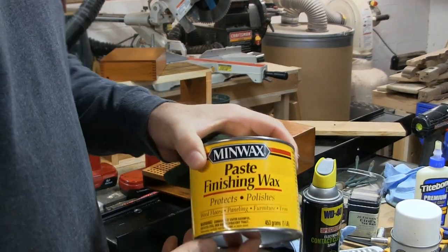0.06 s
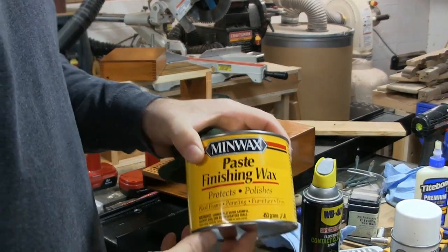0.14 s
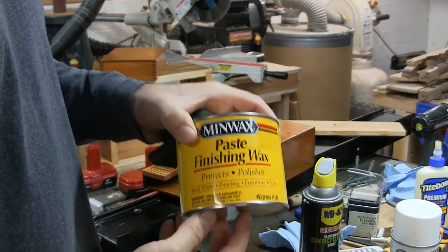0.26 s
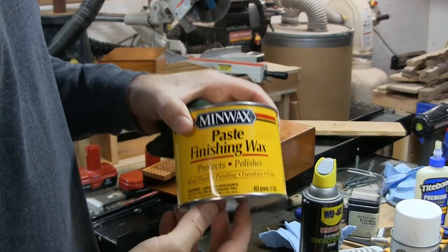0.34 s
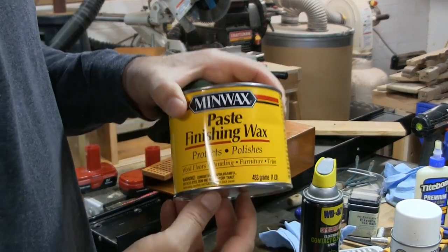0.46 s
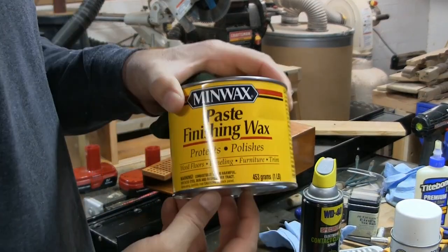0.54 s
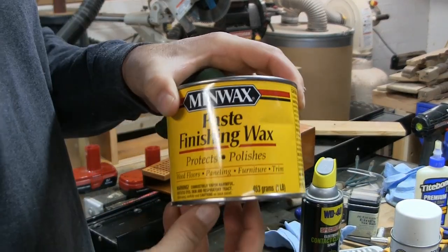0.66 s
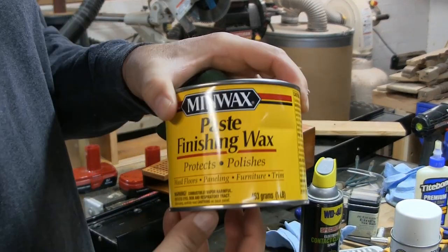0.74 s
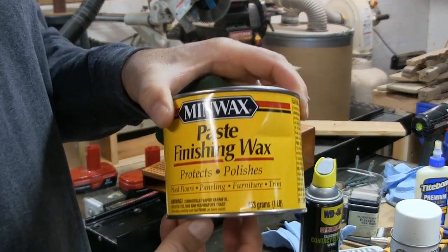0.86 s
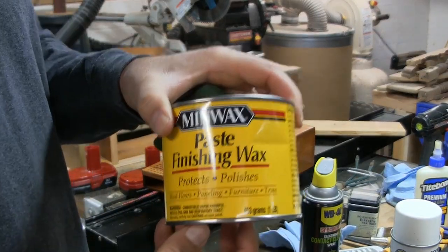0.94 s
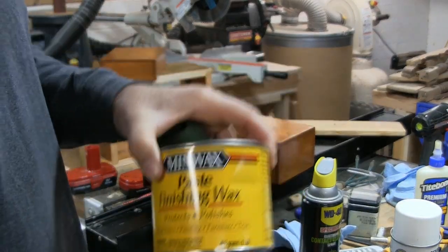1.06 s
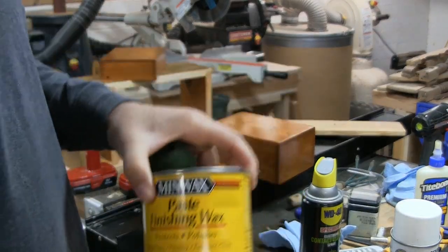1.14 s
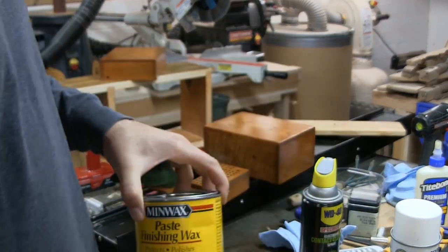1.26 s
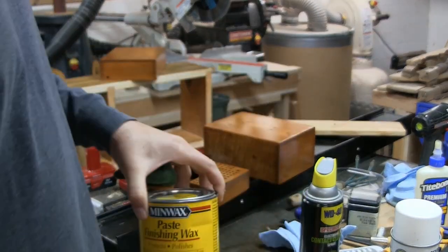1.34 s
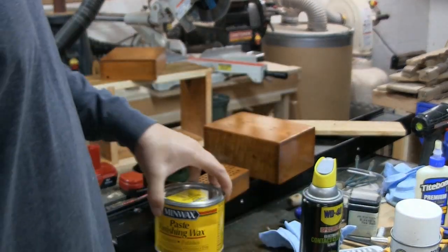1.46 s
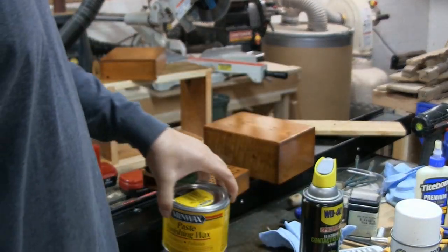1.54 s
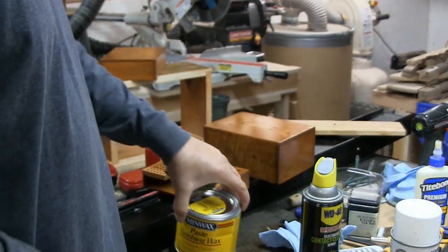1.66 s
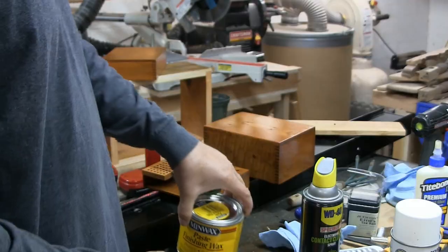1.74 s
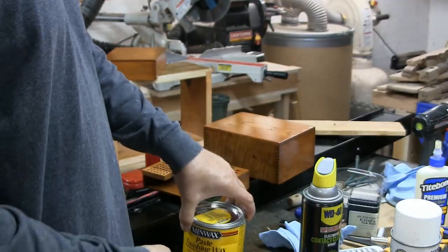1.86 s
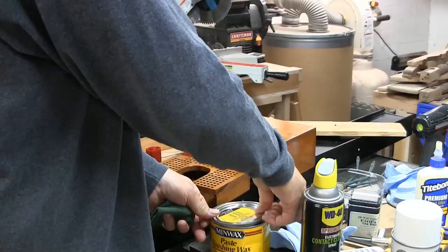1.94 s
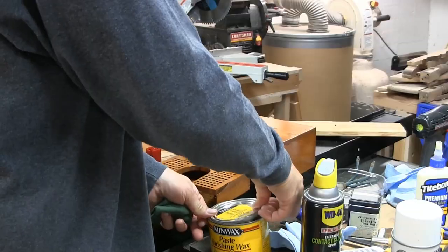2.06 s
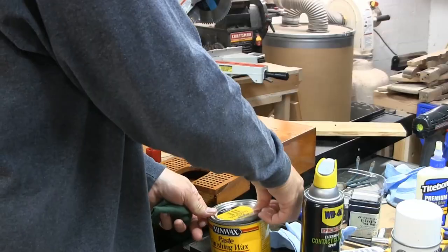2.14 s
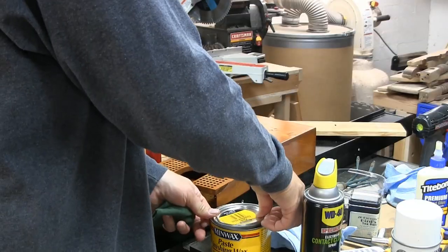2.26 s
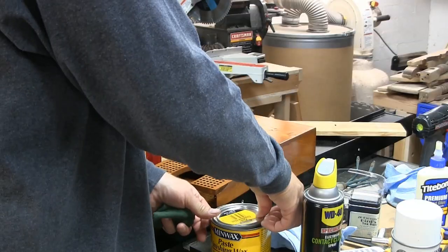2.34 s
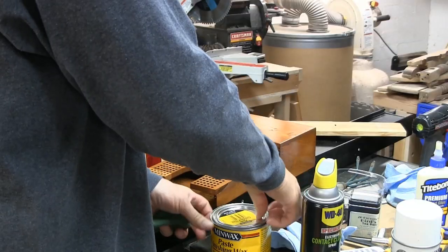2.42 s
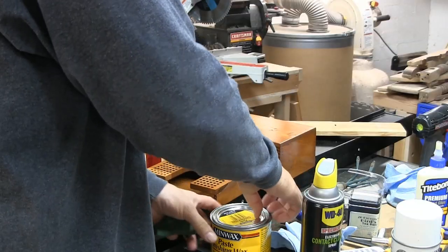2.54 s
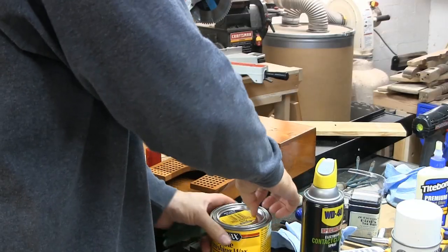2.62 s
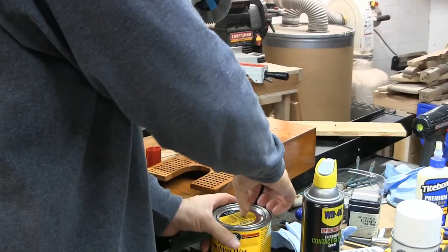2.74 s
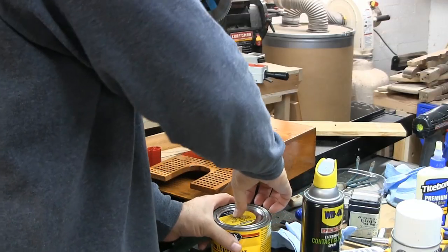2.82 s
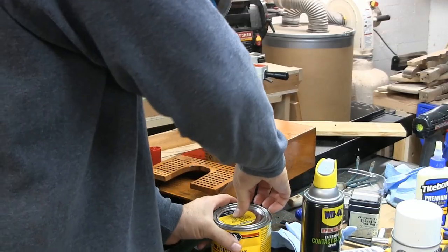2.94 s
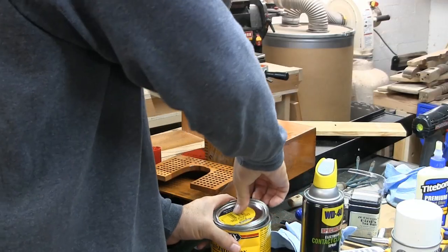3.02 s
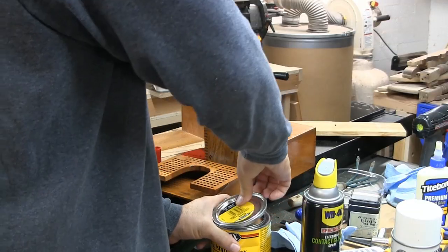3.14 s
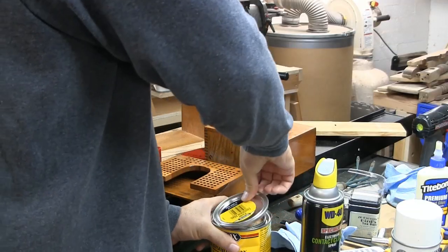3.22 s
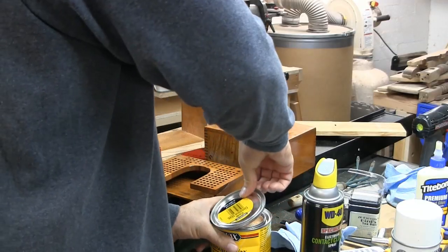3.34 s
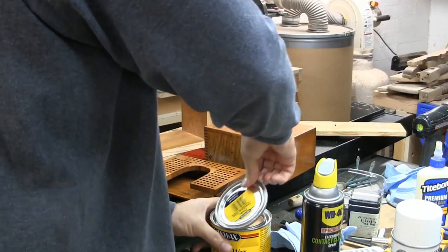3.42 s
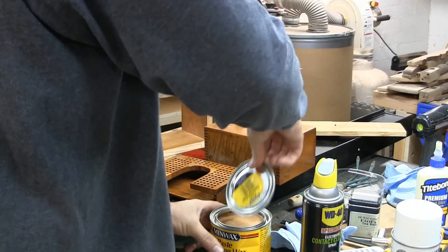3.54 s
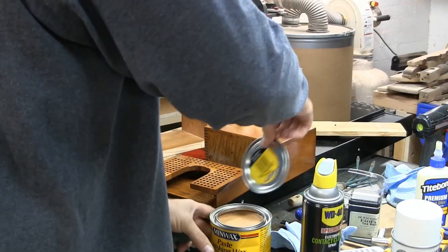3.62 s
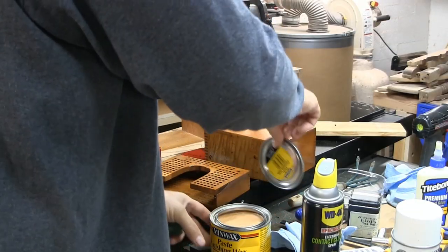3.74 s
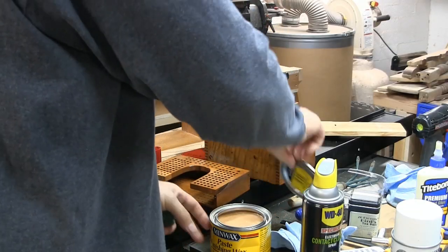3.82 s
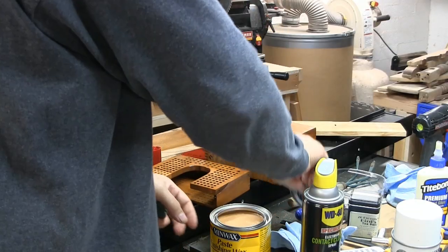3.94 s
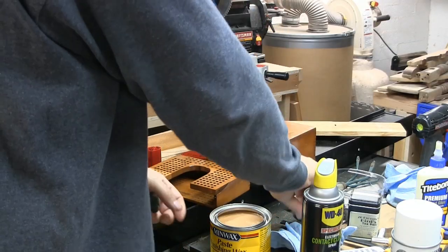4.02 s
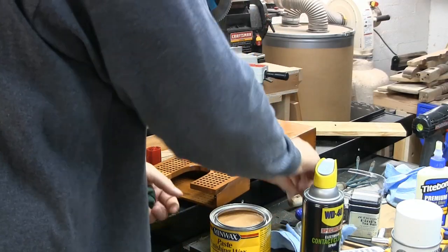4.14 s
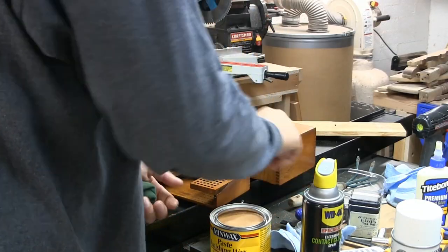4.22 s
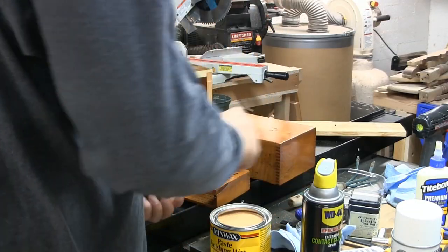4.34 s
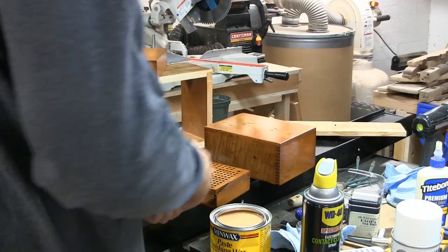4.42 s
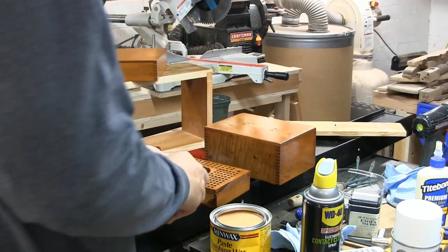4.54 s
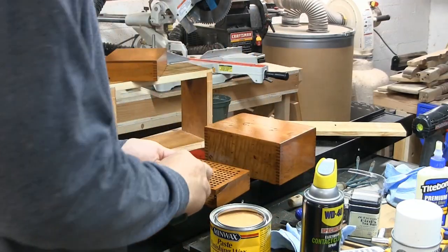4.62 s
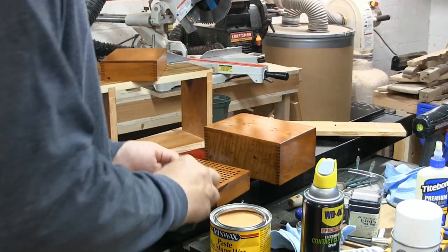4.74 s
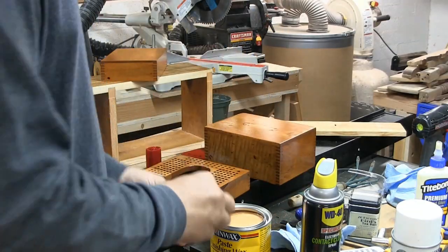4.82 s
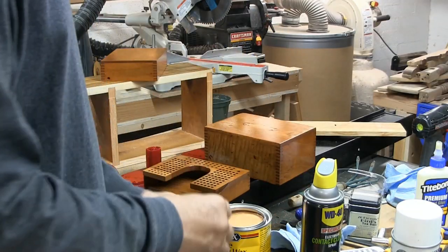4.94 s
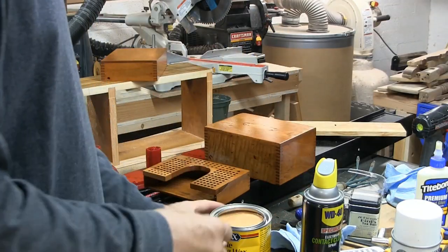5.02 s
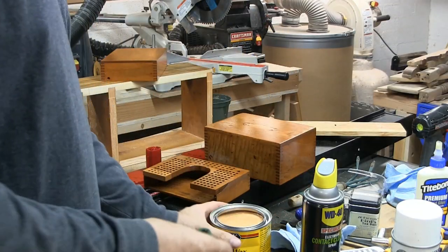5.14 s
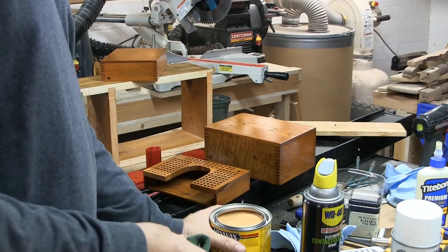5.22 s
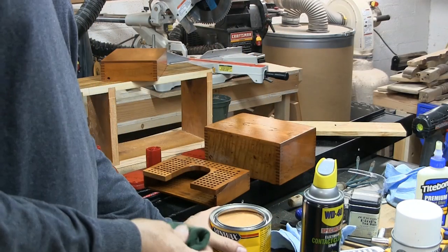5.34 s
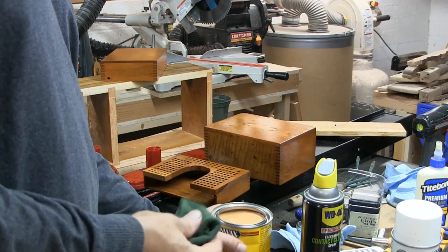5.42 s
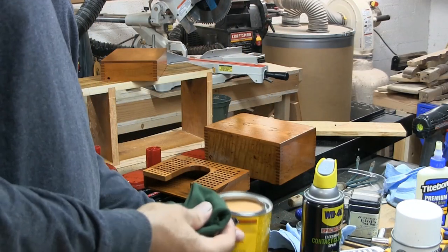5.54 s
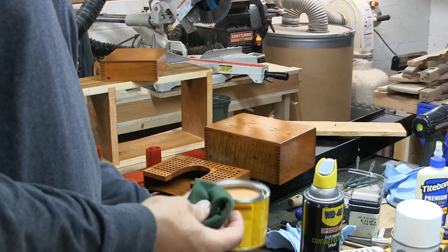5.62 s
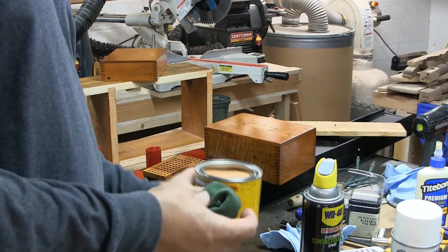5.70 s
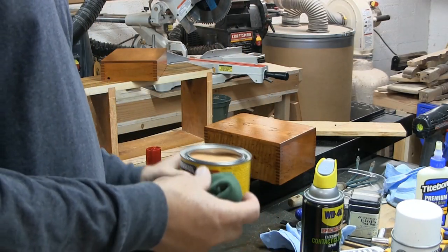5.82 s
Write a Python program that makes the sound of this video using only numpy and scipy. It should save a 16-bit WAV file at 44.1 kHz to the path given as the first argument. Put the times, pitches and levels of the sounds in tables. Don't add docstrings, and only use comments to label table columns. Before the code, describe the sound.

Low tin knocks, two sharp cracks as a steel lid is pried off, and a bright short clatter, with quiet motor hum behind.

```python
import sys
import numpy as np
from scipy import signal
from scipy.fft import rfft, irfft, next_fast_len
from scipy.io import wavfile
from scipy.ndimage import map_coordinates

SR = 44100
rng = np.random.default_rng(int(sys.argv[2]) if len(sys.argv) > 2 else 0)


def gain_from_db(level_db):
    decades = np.asarray(level_db, float) / 20
    return 10 ** decades


def dump(signal):
    limited = np.clip(np.atleast_2d(signal).T, -1, 1)
    pcm = np.round(limited * 32767).astype(np.int16)
    wavfile.write(sys.argv[1], SR, pcm)


N = 258646

# start in seconds, peak in dB, brightness in dB per octave, crack in dB.
LID_BOUNCES = [(4.0492, 2, -1.5, -4), (4.0526, -6, 4, -5.5), (4.057, -6, -4, -5), (4.066, -11.5, -1, -0.5),
               (4.072, -12, -6, -6), (4.085, -9.5, -5, -2.5), (4.125, -7.5, 0.5, 0), (4.1295, -11, 3, -3.5),
               (4.136, 2, 1, -11.5), (4.145, -5, 0, -10), (4.156, -17.5, -2, -10), (4.2121, -12.5, 10, -15),
               (4.2141, -3, -1, -3), (4.2256, -8.5, -1, -12.5), (4.237, -18, -3, -11),
               (4.246, -10.5, 1, -11.5)]
# frequency in Hz, level in dB, decay time t60 in seconds.
FULL_TIN_MODES = [(141.45, -18.5, 0.62), (249, -15.5, 0.72), (309.5, -9, 0.147), (374.4, -4, 0.149),
                  (543.4, 0, 0.1126), (659, -9.5, 0.106), (826, 7, 0.0544), (1004, -39, 0.29),
                  (1184, -33, 0.13), (1297, -17.5, 0.12), (1270, -36, 0.089), (1622, -5, 0.05),
                  (1923, -19, 0.115), (1977, -8.5, 0.049), (2300, -13, 0.0486), (2685, -20.5, 0.055),
                  (3027, -15.5, 0.052)]
FREE_LID_MODES = [(251, -20, 0.12), (655, -21, 0.12), (1295, -15, 0.1), (1585, -8, 0.22), (1995, -14, 0.06),
                  (2254, -12, 0.1), (2615, -22, 0.1), (2897, -16, 0.1), (3270, -12, 0.13),
                  (3455, -13, 0.15), (3789, -17, 0.15), (4074, -7, 0.12), (4121, -15, 0.12),
                  (4184, -8, 0.125), (4966, -11, 0.12), (5095, -5, 0.15), (5351, -24, 0.15),
                  (5592, -6, 0.24), (6257, -9, 0.13), (6477, -17, 0.15), (6900, -1, 0.085), (7027, 1, 0.09),
                  (7493, -20, 0.15), (7713, -12, 0.17), (8160, -16, 0.15), (8500, -15, 0.14),
                  (9046, -13, 0.12), (9869, -14, 0.085), (10919, -22, 0.12), (11591, -28, 0.11)]
# frequency in Hz, level in dB per Hz.
POP_COLOUR = [(59, -60), (100, -53.5), (634, -14.5), (3320, -6.5), (3700, -5.5), (4020, -29), (5420, -3),
              (7140, -22), (9500, -24), (11000, -32.5), (16000, -47.5)]
CLANK_COLOUR = [(59, -51.5), (100, -30.5), (634, -14), (818, -19.5), (1580, -2), (1760, -28.5), (2220, -11),
                (3620, -3.5), (4110, 1.5), (4470, -13), (5900, -8), (6990, -5), (10500, -14),
                (16000, -31.5)]
GRIP_DB_PER_S, LET_GO_DB_PER_S = 4000.5, 900


def unit(x):
    return x / np.sqrt(np.mean(x ** 2) + 1e-20)


def along(points, hz):
    f, v = np.transpose(points)
    return np.interp(np.log(hz + 1), np.log(f + 1), v)


def wobble(rate):
    knots = rng.standard_normal(int(N * rate / SR) + 4)
    return map_coordinates(knots, [np.arange(N) * rate / SR])


def filtered(x, response):
    m = next_fast_len(len(x))
    spectrum = rfft(x, m) * response(np.fft.rfftfreq(m, 1 / SR))
    return unit(irfft(spectrum, m)[:len(x)])


def coloured(x, spectrum):
    return filtered(x, lambda hz: gain_from_db(along(spectrum, hz)))


def resonant(x, peaks):
    def response(f):
        total = 0
        for k, (centre, width, db) in enumerate(peaks):
            width = max(width, 0.028 * centre)
            mode = 1j * f * width / (centre * centre - f * f + 1j * f * width)
            total = total + (-1) ** k * gain_from_db(db) * mode
        return total
    return filtered(x, response)


def slips(rate, clump_db):
    hits = rng.random(N) < rate / SR
    return hits * rng.standard_normal(N) * gain_from_db(clump_db * wobble(80))


def stroke(start, end, start_db, end_db, swell, fade):
    t = np.arange(N) / SR
    held_db = np.interp(t, [start, max(end, start + 1 / SR)], [start_db, end_db])
    return gain_from_db(held_db - swell * np.clip(start - t, 0, None) - fade * np.clip(t - end, 0, None))


def ring(modes, t, scatter_db, tilt_db=0, length=1, waver_db=0):
    hz, db, t60 = np.transpose(modes)[:, :, None]
    db = db + tilt_db * np.log2(hz / 1000) + scatter_db * rng.standard_normal(hz.shape)
    knots = rng.standard_normal((2, len(hz), 64))
    swing, slip = np.array([[np.interp(t, np.arange(64) / 120, k) for k in part] for part in knots])
    hz = hz * (1 + 0.0018 * knots[1, :, -1:])
    cycles = (hz * t).astype(np.float32)
    phase = np.float32(2 * np.pi) * cycles + (0.21 * waver_db * slip).astype(np.float32)
    tones = np.sin(phase) * (1 - np.exp(-cycles / np.float32(1.8)))
    level_db = db + waver_db * swing - 60 * t / (np.clip(t60, 0.01, 0.6) * length)
    tones *= np.exp((level_db * np.log(10) / 20).astype(np.float32))
    return tones.sum(0) / np.sqrt(np.sum(gain_from_db(db) ** 2) / 2)


def blows(events, modes, colour, ring_db, crack_s, rattle_db, rattle_s, rise_s, waver_db, length):
    # start in seconds, loss in dB.
    damped = [(1.87, 0.5), (1.888, -3), (2.351, 0), (3.2857, -1), (3.2939, -4.5), (3.5243, -4), (4.061, -6),
              (4.091, -2.5), (4.142, -6), (4.153, 0.5), (4.222, -4.5), (4.26, -4.5)]
    damp_s = 0.002
    out, t = np.zeros(N + SR), np.arange(SR * 3 // 10) / SR
    for s, db, tilt_db, crack_db in events:
        tilted = [(hz, g + tilt_db * np.log2(hz / 1000)) for hz, g in colour]
        noise = coloured(rng.standard_normal(len(t)), tilted)
        rise = 1 - np.exp(-(t / rise_s) ** 2)
        crack = noise * rise * gain_from_db(-60 * t / crack_s)
        crack = gain_from_db(crack_db - 8) * crack / np.abs(crack).max()
        rattle = noise * rise * gain_from_db(rattle_db - 60 * t / rattle_s)
        body = gain_from_db(ring_db) * rise * ring(modes, t, 0.965, tilt_db, length, waver_db)
        touches = [(at, loss) for at, loss in damped if s < at < s + t[-1]]
        loss_db = sum(loss * np.clip((s + t - at) / damp_s, 0, 1) for at, loss in touches)
        out[round(s * SR):][:len(t)] += gain_from_db(db + loss_db) * (crack + body + rattle)
    return out[:N]


def tin():
    # start in seconds, peak in dB, brightness in dB per octave, crack in dB.
    set_down = [
        (1.8567, -2.5, -1, -1),
        (1.878, -13, -1, 0.5),
        (1.884, -26, -4, -5),
    ]
    shift = [
        (1.9602, -7, 0.5, -2),
        (2.3204, -8, 0.5, -6),
        (2.3232, -18, 4.5, 0),
        (2.342, -14.5, -4, -12.5),
    ]
    settle = [(1.985, -28, -8.5, -10), (2.02, -27.5, 2, -10.5), (2.045, -30.5, 3, -9.5)]
    bench_knocks = [(2.4475, -24, -6, -20.5), (3.521, -33, -4, -14), (4.051, -29.5, -6, -19),
                    (3.124, -31, 6.5, -10), (3.131, -30, 3, -11.5), (3.2905, -30.5, 4.5, -19.5),
                    (4.137, -34.5, -5, -20), (4.2143, -36, -9.5, -20.5)]
    # frequency in Hz, level in dB, decay time t60 in seconds.
    landing_modes = [(100.7, -17, 0.26), (173.5, -20.5, 0.286), (268.3, -18.5, 0.53), (377, 0.5, 0.108),
                     (460.2, -4, 0.132), (510, -12, 0.06), (550.6, 0, 0.138), (633.7, -4.5, 0.107),
                     (828.4, 0, 0.116), (981, -16, 0.12), (1130, -28, 0.14), (1329, 6.5, 0.039),
                     (1386, -9.5, 0.067), (1507.6, 7.5, 0.0478), (1786, -14, 0.107), (2130, -16.5, 0.117),
                     (2580, -27.5, 0.027), (3043, -23, 0.037)]
    turned_modes = [(153.96, -17, 0.65), (262.5, -22, 0.44), (301.5, -11, 0.14), (368.7, -9, 0.161),
                    (548.8, 2, 0.1104), (654.4, -3.5, 0.108), (820, 0, 0.121), (956.6, -5, 0.164),
                    (1048, 3, 0.057), (1201, -4, 0.069), (1243, -10, 0.12), (1606, -5.5, 0.073),
                    (1848, 0, 0.0343), (2222, -9, 0.045), (2390, -16, 0.058), (2567, -17, 0.063),
                    (3100, -16, 0.06)]
    bench_modes = [(215.3, 0, 0.065), (385, 5, 0.05551), (523.9, -4.5, 0.053), (650.7, -12.5, 0.0705),
                   (1092, -17, 0.045)]
    # frequency in Hz, level in dB per Hz.
    slam_colour = [(47, -60), (80, -42.5), (212, -10.5), (346, -8), (1070, -1.5), (1600, -3), (2000, -14),
                   (3320, -17.5), (5000, -25), (9000, -44.5), (16000, -50.5)]
    thud_colour = [(47, -59), (80, -35), (212, -19), (346, -5), (1070, -4.5), (1530, -6), (2380, -11),
                   (3320, -22.5), (16000, -61.5)]
    soft = dict(crack_s=0.00746, rattle_db=-19.5, rattle_s=0.1595, waver_db=3.5, rise_s=0.0013)
    landing = blows(set_down, landing_modes, slam_colour, ring_db=-3, length=0.767, **soft)
    rebound = blows(shift[:1] + settle, FULL_TIN_MODES, thud_colour, ring_db=-7, length=1, **soft)
    turn = blows(shift[1:], turned_modes, thud_colour, ring_db=-9, length=0.822, **soft)
    bench = blows(bench_knocks, bench_modes, thud_colour, ring_db=4.5, length=0.65, **soft)
    return landing + rebound + turn + bench


def prised_lid():
    # start in seconds, peak in dB, brightness in dB per octave, crack in dB.
    prise = [
        (3.1012, -21, -1, -6),
        (3.2835, -6, 2, 2),
        (3.2908, -0.5, -1, 0),
    ]
    creaks = [(3.2183, -36.5, 5, -5), (3.2432, -34.5, 5.5, -2.5), (3.259, -27, -6.5, -8),
              (3.268, -22.5, -11.5, -15.5), (3.309, -28.5, 0.5, -11.5), (3.324, -26.5, -2, -9),
              (3.336, -25, 0.5, -16), (3.347, -30.5, 1, -12), (3.365, -26, 2, -17),
              (3.4383, -36.5, -2, -20)]
    # frequency in Hz, level in dB, decay time t60 in seconds.
    levered_modes = [(827, -7, 0.089), (1060, 1.5, 0.0304), (1231, -7, 0.068), (1713, -12, .04),
                     (2748, 0.5, 0.0322), (3560, -5.5, 0.035), (4006, -6.5, 0.0297), (4956, -4, 0.028),
                     (5820, -7.5, 0.0283), (7050, -11, .028), (8700, -13, 0.026)]
    tight_modes = [(940, -10.5, 0.042), (1273, 2.5, 0.0454), (1448, -2.5, 0.042), (2464, -6, 0.078),
                   (3336, -6, 0.068), (3960, -11, 0.042)]
    strained_modes = [(645, -19.5, 0.044), (980, -19, 0.046), (1314, -9.5, 0.064), (1542, 3, 0.057),
                      (2463, -9, 0.054), (2783, -0.5, 0.065), (3483, -11, 0.053), (3600, -6.5, 0.062),
                      (5000, -14.5, .04)]
    seated_modes = [(652, -1.5, 0.1225), (1010, -39, 0.11), (1275, -1, 0.079), (1399, 11.5, 0.0148),
                    (1522, -6, 0.084), (1580, -27, 0.091), (2430, -4.5, 0.073), (2810, -11.5, 0.146),
                    (3546, 2.5, 0.0337), (4030, -3.5, 0.07), (5060, -32, 0.036), (6175, -20, 0.073),
                    (7160, -17, 0.167), (8600, -22, 0.069), (9820, -19, 0.085)]
    # frequency in Hz, level in dB per Hz.
    snap_colour = [(59, -60), (100, -43), (1360, 7), (1870, -20), (3050, -10.5), (3470, -6.5), (4470, -15),
                   (7140, -11), (16000, -39.5)]
    lever = blows(prise[:1], levered_modes, snap_colour, ring_db=-3.5, crack_s=0.014, rattle_db=-17,
                  rattle_s=0.102, rise_s=0.00103, waver_db=1.5, length=0.813)
    creak = dict(ring_db=-1, crack_s=0.0103, rattle_db=-27.5, rattle_s=0.05, rise_s=0.00157,
                 waver_db=-0.5, length=0.764)
    tight = blows(creaks[:4], tight_modes, snap_colour, **creak)
    strained = blows(creaks[4:], strained_modes, snap_colour, **creak)
    seated = blows(prise[1:], seated_modes, snap_colour, ring_db=-8, crack_s=0.0167, rattle_db=-29,
                   rattle_s=0.11, rise_s=0.00062, waver_db=2.5, length=0.9)
    return lever + tight + strained + seated


def released_lid():
    # start in seconds, peak in dB, brightness in dB per octave, crack in dB.
    release = [
        (3.482, -23.5, 0.052, -3.5),
        (3.503, -20.5, -0.039, 2),
        (3.5203, -1, -0.83, 5),
        (3.5228, -3.5, -0.58, -3.5),
    ]
    rim_brushes = [(3.5395, -19.5, 10.5, 1), (3.553, -19, 7.5, -5), (3.564, -21, -5, -6.5)]
    # frequency in Hz, level in dB, decay time t60 in seconds.
    held_modes = [(655, -21.5, 0.25), (922.5, -14.5, 0.251), (1297, 3.5, 0.037), (1616, -7.5, 0.127),
                  (2114, 3.5, 0.0255), (2197, -6, 0.136), (2686, -9.5, 0.036), (3104, 1, 0.0245),
                  (3540, -24, 0.12), (3720, 4, 0.0567), (4233, -2, 0.057), (4695, -30.5, 0.11),
                  (5040, -32, 0.08), (5220, -14.5, 0.039), (5984, -2, 0.0343), (6150, -18.5, 0.126),
                  (6720, -33, 0.073), (7870, -30, 0.137), (8070, -23, 0.15), (9880, -39, 0.06)]
    return blows(release + rim_brushes, held_modes, POP_COLOUR, ring_db=-5.5, crack_s=0.0167,
                 rattle_db=-27.5, rattle_s=0.096, rise_s=0.0003, waver_db=0.5, length=0.552)


def dropped_lid():
    flat_db = [-32, -13.5, -15.5, -17, -8.5, -12, -40.5, -17, -8, -20.5, -33.5, -10, -4, -0.5, -29.5, -5,
               -14.5, -27, -9.5, -26, 5, -3.5, -33, -4.5, -6, -11, 0.5, -9, -19.5, -41.5]
    edge_db = [-16, -21.5, -16.5, -16, -11.5, -10.5, -22.5, -12, -9.5, -18, -19.5, -3.5, -19, -12, -7, -2,
               -18.5, -15, -7.5, -17, -6, 4.5, -20, -12.5, -16, -20, -9.5, -9.5, -29, -36]
    last_db = [-15, -24.5, -15, -11.5, -13, -12.5, -17.5, -9, -10.5, -11.5, -13.5, -18.5, -26.5, -3.5, -8,
               -3.5, -23.5, -6.5, -10, -13, 3, -9.5, -22, -10, -19, -16.5, -11.5, -7.5, -34.5, -34]
    loose = dict(crack_s=0.026, rattle_db=-19.5, rattle_s=0.12, rise_s=0.000687, waver_db=2.26, length=0.664)
    out = 0
    for bounces, levels, ring_db in [(LID_BOUNCES[:6], flat_db, -9.5), (LID_BOUNCES[6:11], edge_db, -9.5),
                                     (LID_BOUNCES[11:], last_db, -7)]:
        struck = [(hz, db, t60) for (hz, _, t60), db in zip(FREE_LID_MODES, levels)]
        out = out + blows(bounces, struck, CLANK_COLOUR, ring_db=ring_db, **loose)
    return out


def rocking():
    # start in seconds, end in seconds, start level in dB, end level in dB.
    chatters = [(4.06, 4.113, -23.5, -26.5), (4.159, 4.22, -26.5, -30.5), (4.248, 4.262, -34.5, -24.5)]
    settle_db_per_s = 450
    grit = slips(rate=3600, clump_db=5.5)
    lid_ring = ring(FREE_LID_MODES, np.arange(SR // 8) / SR, 0, tilt_db=-4.5, length=0.305)
    steel = signal.fftconvolve(grit, lid_ring)[:N]
    chatter = unit(steel) + gain_from_db(-11) * coloured(grit, CLANK_COLOUR)
    pressure = sum(stroke(*row, GRIP_DB_PER_S, settle_db_per_s) for row in chatters)
    return gain_from_db(-2) * pressure * chatter


def scrape():
    # start in seconds, end in seconds, start level in dB, end level in dB.
    groans = [(3.227, 3.17, -36.5, -39), (3.27, 3.09, -32, -31), (3.3, 3.51, -42.5, -39),
              (3.44, 3.478, -47.5, -43), (3.483, 3.274, -38, -34)]
    strokes = [
        (3.2, 3.264, -57.5, -53),
        (3.268, 3.282, -43.5, -35),
        (3.298, 3.376, -33, -47.5),
        (3.422, 3.479, -51, -37.5),
        (3.4825, 3.514, -32.5, -33),
    ]
    # frequency in Hz, width in Hz, level in dB.
    seated_rim = [(636, 27, -26), (1296, 29, -18.5), (1504, 107, 0.5), (2640, 58, -4.5), (3690, 78, -9.5),
                  (3670, 43, -14.5), (5580, 160, -14.5), (5150, 64, -19), (7105, 34, -11), (8470, 42, -21),
                  (9770, 31, -20.5)]
    leaving_rim = [(1294, 71, -8), (1570, 32, 2.5), (2790, 110, -8.5), (3210, 110, -8), (3520, 21, -14),
                   (3534, 55, -1), (5140, 35, -9.5), (5560, 170, -10.5), (6100, 35, -17.5),
                   (6810, 110, -23.5), (6770, 48, -15), (9770, 48, -22.5)]
    groan = resonant(slips(rate=920, clump_db=0.5), [(1260, 120, -13), (1550, 90, -4.5), (1528, 58, 2)])
    out = gain_from_db(-6) * groan * sum(stroke(*row, GRIP_DB_PER_S, LET_GO_DB_PER_S) for row in groans)
    for rows, rim in [(strokes[:3], seated_rim), (strokes[3:], leaving_rim)]:
        grit = slips(rate=7600, clump_db=0.61)
        rasp = resonant(grit, rim) + gain_from_db(-8) * coloured(grit, POP_COLOUR)
        pressure = np.max([stroke(*row, GRIP_DB_PER_S, LET_GO_DB_PER_S) for row in rows], axis=0)
        out += gain_from_db(1.5) * rasp * pressure
    return out


def bending():
    # start in seconds, frequency in Hz, peak in dB, decay time t60 in seconds.
    clean_modes = [(2.3203, 826, -15.5, 0.0497), (2.3215, 385, -27.5, 0.154), (2.447, 160, -44, 0.133),
                   (4.051, 4188, -24, .22), (4.051, 3270, -26.5, .14), (3.5205, 655, -26, 0.322),
                   (3.521, 275, -32, 0.0564), (4.098, 1585, -30, 0.167), (4.125, 1585, -22.5, 0.1),
                   (4.137, 140, -37.5, 0.52), (4.144, 1585, -21, 0.165), (4.215, 140, -42, 0.47),
                   (4.244, 1585, -29.5, 0.202)]
    # frequency in Hz, level in dB, decay time t60 in seconds.
    shimmer = [(10540, -8.5, 0.22), (10780, -1, 0.22), (12240, -2.5, 0.11), (13700, -8.5, 0.23),
               (14130, -12.5, 0.1405), (14800, -11, 0.076)]
    shimmer_db, rise_s = -35, 0.000812
    high = []
    for s, db, *_ in (LID_BOUNCES[0], LID_BOUNCES[8], LID_BOUNCES[12]):
        high += [(s, hz, db + level + shimmer_db, min(t60, 0.3)) for hz, level, t60 in shimmer]
    out, t = np.zeros(N + SR), np.arange(SR * 2 // 5) / SR
    for s, hz, db, t60 in clean_modes + high:
        envelope = gain_from_db(db - 60 * t / t60) * (1 - np.exp(-t / rise_s))
        out[round(s * SR):][:len(t)] += envelope * np.sin(2 * np.pi * hz * t)
    return out[:N]


def walls(x):
    # frequency in Hz, decay time t60 in seconds.
    decay = [(200, 0.389), (1500, 0.1956), (6000, 0.269), (14000, 0.226)]
    hz, t, z = signal.stft(rng.standard_normal(SR // 2), SR, nperseg=256)
    tail = signal.istft(z * gain_from_db(-60 * t / along(decay, hz)[:, None]), SR, nperseg=256)[1]
    delayed = np.pad(x, (300, 0))
    return signal.fftconvolve(delayed, tail / np.linalg.norm(tail))[:N]


def hands():
    # start in seconds, end in seconds, level in dB.
    rubs = [(0.286, 0.42, -46), (.81, 0.837, -58), (1.129, 1.171, -50.5), (1.306, 1.329, -61),
            (1.45, 1.48, -72), (1.625, 1.633, -70.5), (2.477, 2.85, -63)]
    sleeve = [(0, 0.099, -50.5), (0.325, 0.408, -57.5), (1.351, 1.622, -55)]
    # start in seconds, peak in dB, level of the tin's body in dB.
    ticks = [(0.014, -40.5, 9), (0.3174, -34.5, 9), (0.5883, -42, 2.5), (1.128, -39, -9.5),
             (1.322, -32, 0.5), (1.352, -40, 2.5), (1.373, -35.5, 6), (1.3913, -36, 5.5), (1.433, -37, 9),
             (1.4798, -33.5, 4), (1.5584, -32, 5), (1.626, -32, -2.5), (1.7419, -35.5, 7.5),
             (2.166, -39, 12), (2.322, -36.5, -20.5), (2.4475, -26.5, -16.5), (2.5933, -37, 5),
             (2.6309, -28.5, -9), (2.89, -24.5, -32)]
    # frequency in Hz, level in dB per Hz.
    skin_colour = [(50, -46), (150, 5), (400, 11), (1500, 3), (4000, 5), (8000, -0.5), (15800, -10.5),
                   (15950, -80)]
    cloth_colour = [(100, -42.5), (346, -17.5), (1070, -2.5), (1900, 0), (3300, -11.5), (5000, -16.5),
                    (16000, -59)]
    nail_colour = [(300, -27.5), (1500, 1.5), (4500, 8.5), (8000, -6.5), (16000, -24)]
    grains = rng.standard_normal(N) * gain_from_db(1.16 * wobble(300) + 0.81 * wobble(27.04))
    sliding = sum(stroke(s, end, db, db, swell=171, fade=244.5) for s, end, db in rubs)
    swish = sum(stroke(s, end, db, db, swell=77.5, fade=77.5) for s, end, db in sleeve)
    out = sliding * coloured(grains, skin_colour) + swish * coloured(grains, cloth_colour)
    t = np.arange(SR // 20) / SR
    for s, db, body_db in ticks:
        tick = coloured(rng.standard_normal(len(t)), nail_colour) * gain_from_db(-60 * t / 0.007)
        knock = gain_from_db(body_db + 13) * ring(FULL_TIN_MODES, t, 0.55, tilt_db=7, length=0.172)
        out[round(s * SR):][:len(t)] += gain_from_db(db - 10) * (tick + knock)
    return out


def workshop():
    # frequency in Hz, level in dB rms.
    hum_lines = [(120.6, -51), (110.5, -57), (33, -81), (234, -66), (147.4, -64), (921, -66), (1000, -67),
                 (1648, -72)]
    # start in seconds, end in seconds, level in dB rms.
    drones = [(.36, 0.443, -61), (1.098, 1.167, -64), (1.36, 1.446, -58), (1.7, 1.763, -63),
              (5.497, 5.61, -61)]
    # frequency in Hz, level in dB per Hz.
    air_colour = [(15, -58), (25, -43), (36, -27), (50, -29.5), (76, -24.5), (102, 3), (123, 14),
                  (153, -15), (223, -11.5), (263, -18), (394, -12), (427, -15.5), (911, -13.5),
                  (1440, -22.5), (1700, -17.5), (4030, -22), (15800, -47.5), (15950, -110)]
    # frequency in Hz, width in Hz, level in dB.
    duct = [(259.7, 30, 5.5), (997.6, 187, 10), (1712, 242, 4.5)]
    t = np.arange(N) / SR
    hum = 0
    for hz, db in hum_lines:
        level = gain_from_db(db + 2 + 0.47 * wobble(7.3))
        hum = hum + level * np.sin(2 * np.pi * hz * t + 0.112 * wobble(2.014))
    boom = np.sin(2 * np.pi * 236.2 * t + 0.71 * wobble(9))
    hum += boom * sum(stroke(s, end, db + 1, db + 6, swell=121, fade=119) for s, end, db in drones)
    quiet_bass = [(hz, db - 16 * (90 < hz < 140)) for hz, db in air_colour]
    air = coloured(rng.standard_normal(N), quiet_bass) * gain_from_db(0.43 * wobble(2.9))
    air += gain_from_db(-5.5) * resonant(rng.standard_normal(N), duct)
    return hum + gain_from_db(-48.5) * air


def small_body(x, hz):
    return signal.sosfilt(signal.butter(N=3, Wn=hz, btype="high", fs=SR, output="sos"), x)


def scene():
    knocks = small_body(tin() + bending(), hz=105.25)
    lid = prised_lid() + released_lid() + dropped_lid()
    steel = small_body(lid + scrape() + rocking(), hz=213.04)
    near = knocks + gain_from_db(-10.5) * walls(knocks) + steel + gain_from_db(-10) * walls(steel)
    return (near + hands() + workshop())[None]


def low_pass(x):
    return signal.sosfilt(signal.butter(12, 16670, fs=SR, output="sos"), x)


def record(dry):
    t = np.arange(N) / SR
    dip = gain_from_db(np.interp(t, [1.934, 1.938, 1.944, 1.958], [0, -11, -5, 0]))
    limited = dry * dip / (1 + np.abs(dry / 0.9) ** 6) ** (1 / 6)
    m = next_fast_len(N)
    in_band = np.fft.rfftfreq(m, 1 / SR) < 16000
    mix = irfft(rfft(limited, m) * in_band, m)[:, :N]
    return low_pass(mix)


dry = scene()
out = record(dry)
dump(out)
```